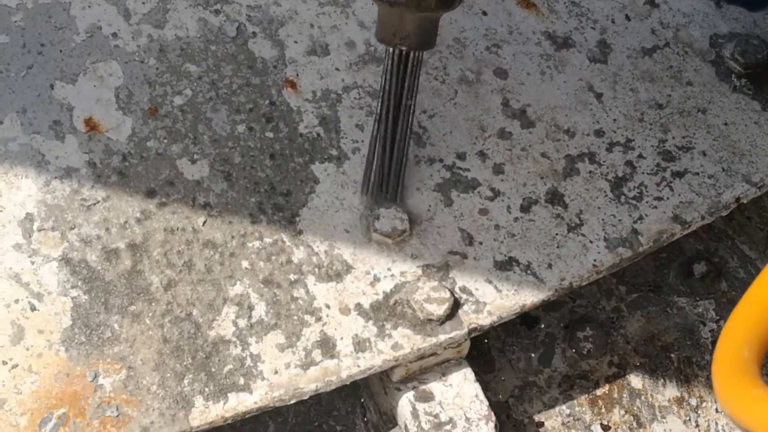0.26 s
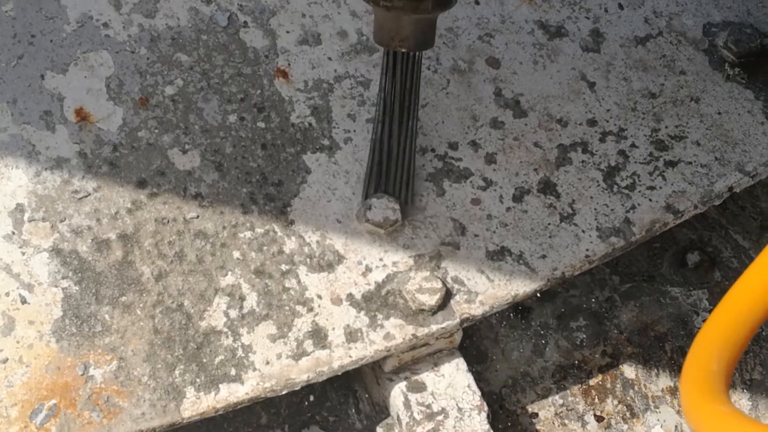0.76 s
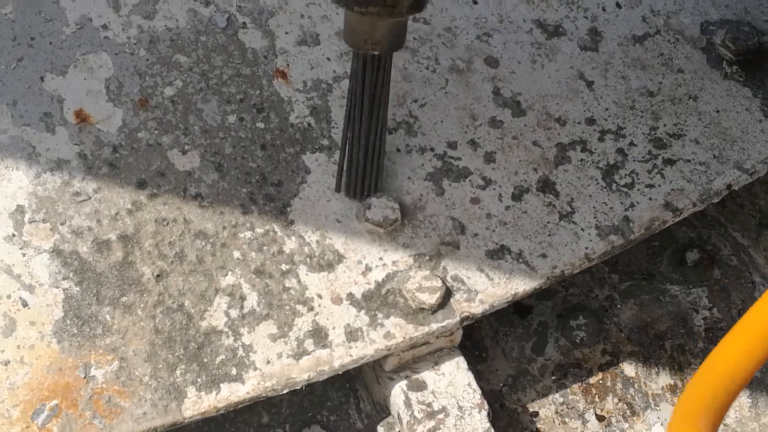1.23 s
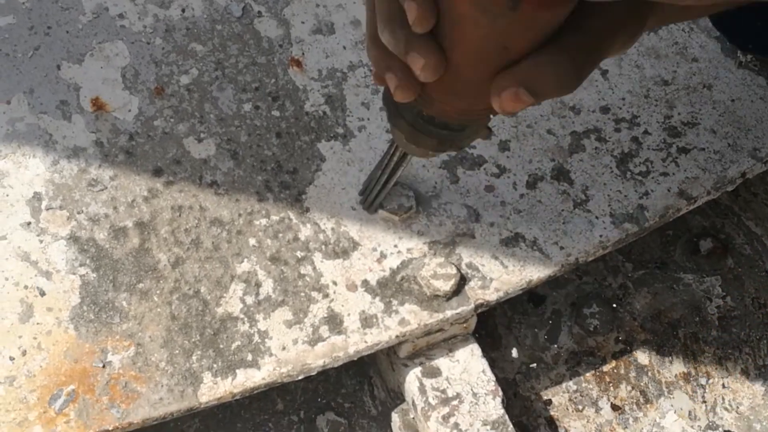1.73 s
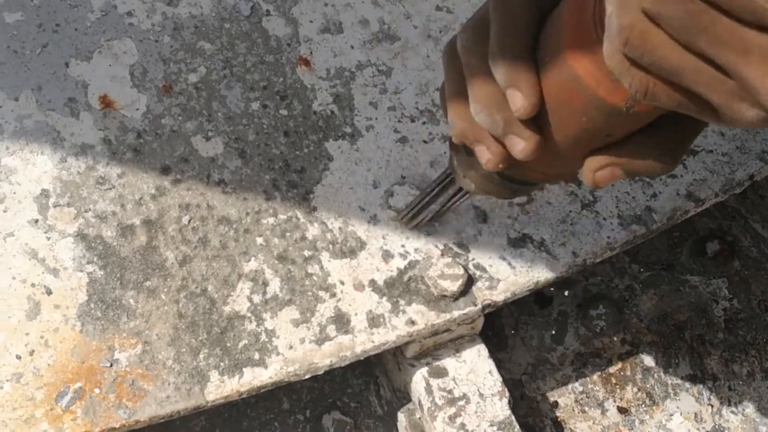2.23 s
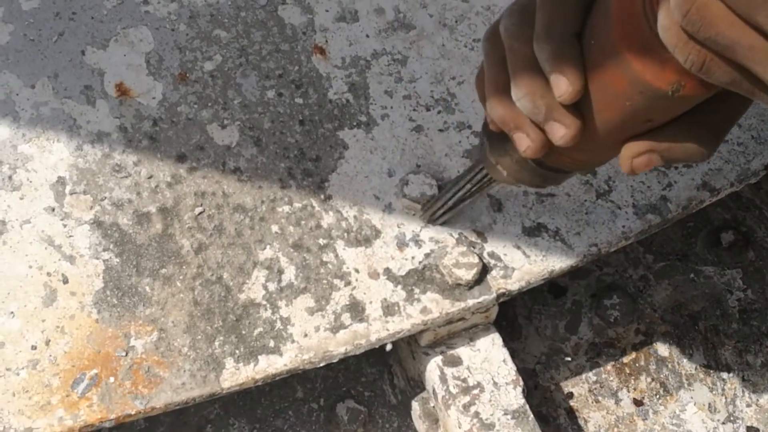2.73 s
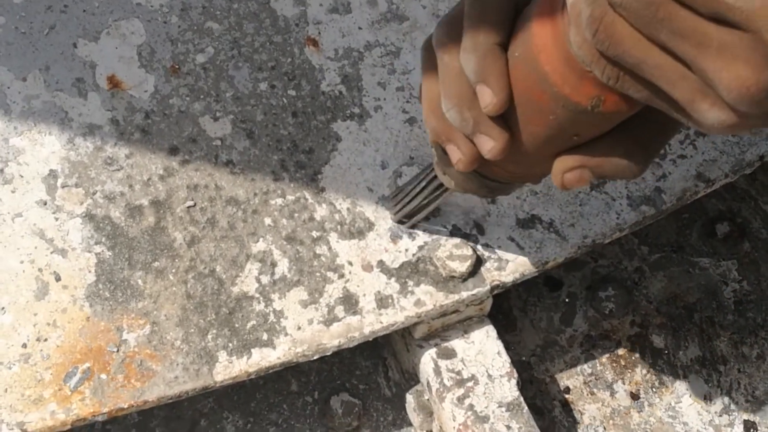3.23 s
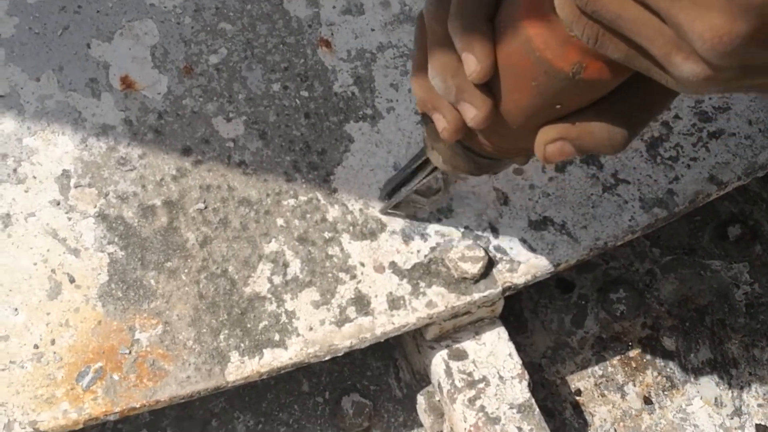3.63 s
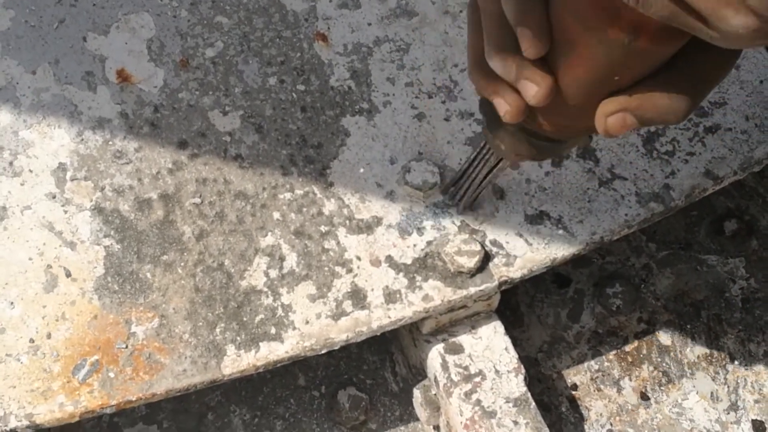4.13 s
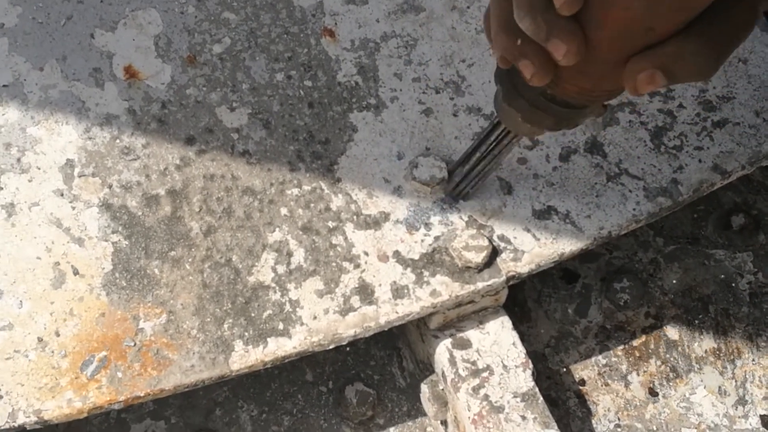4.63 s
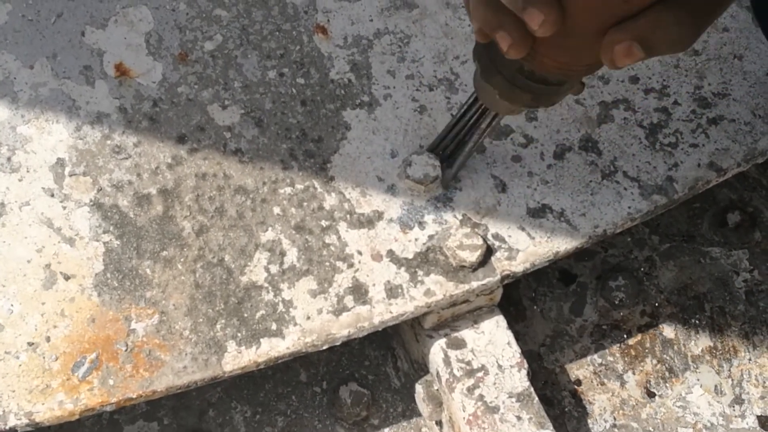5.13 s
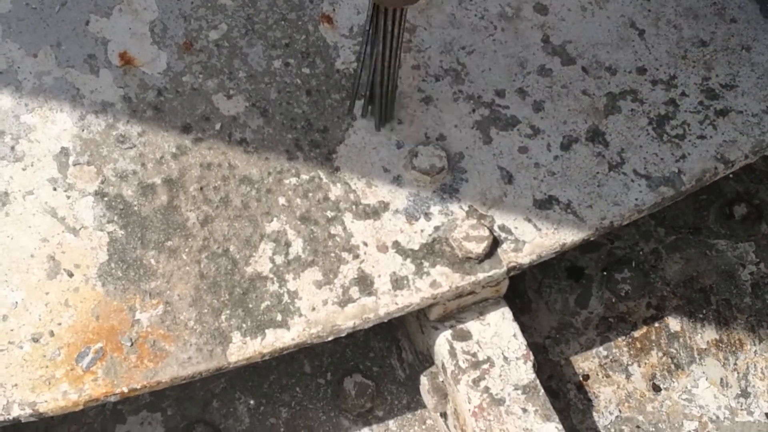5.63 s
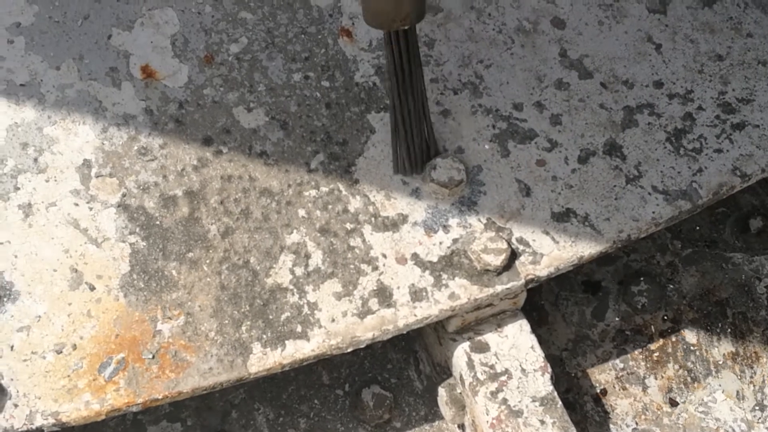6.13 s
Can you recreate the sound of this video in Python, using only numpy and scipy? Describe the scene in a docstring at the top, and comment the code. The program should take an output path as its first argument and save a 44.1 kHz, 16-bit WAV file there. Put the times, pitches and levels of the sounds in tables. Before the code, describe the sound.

Close, buzzing metallic chatter of steel needles chipping a painted plate, with steady hammer blows smacking and ringing the same deck.

```python
"""A harsh, rattling buzz runs throughout: a pneumatic needle scaler chipping paint off a steel deck. Its piston
throws a bundle of needles at the plate about 53 times a second; they crack, bounce, ring and rattle in their guide.
Close by, two hand hammers pound the same deck, each about twice a second, until one stops after 3.5 s;
the blows smack, clang and leave the deck booming.
The left microphone port faces the tool; the right one is shaded and hears it later and duller."""
import sys
import numpy as np
from scipy import signal
from scipy.fft import rfft, irfft, next_fast_len
from scipy.io import wavfile

SR = 44100
rng = np.random.default_rng(int(sys.argv[2]) if len(sys.argv) > 2 else 0)


def store_wav(level_fs):
    """Save 16-bit WAV to argv[1]."""
    pcm = np.round(np.clip(np.atleast_2d(level_fs), -1, 1) * 32767)
    wavfile.write(sys.argv[1], SR, pcm.T.astype(np.int16))


N = 280917

# Piston rate, drifting with air pressure and load: [time_s, strokes_hz]
PISTON_RATE = [(0.0, 51.27), (0.6, 53.79), (0.9, 50.75), (1.05, 53.37), (1.2, 51.47), (1.65, 53.06),
               (2.1, 51.08), (2.25, 52.51), (2.85, 53.75), (3.15, 52.51), (3.6, 55.03), (4.05, 50.67),
               (4.2, 53.74), (5.55, 52.92), (6.37, 55.44)]
# How squarely the bundle is pressed on the plate: [time_s, press_db]
PRESS = [(0.0, -1), (0.75, 3.5), (0.9, -1.2), (1.65, 4.5), (1.8, -3), (2.85, -2.9), (3.15, 0.2), (3.9, -1),
         (5.4, 1.5), (5.7, 9), (5.85, 2.5), (6.37, 2.5)]
# The hardest strikes, some mostly crack, some mostly thump: [start_s, relative crack_db, relative thump_db]
HARD_STRIKES = [(0.022, 0, -43), (0.234, -3, -32), (0.2725, -9, -28.5), (0.3668, -18, -30),
                (0.405, -4, -28), (0.4202, -13, -35), (0.4446, -7, -29), (0.4944, -4, -40),
                (0.5198, -20, -26.5), (0.5736, -4.5, -44), (0.6269, 1, -32), (0.745, -4.5, -25),
                (0.7983, -3.5, -31), (0.879, 2.5, -31), (0.9132, -5, -28.5), (1.0336, -9, -29.5),
                (1.2, 2, -30), (1.307, -2, -27), (1.322, 0, -29), (1.3974, -9, -40), (1.5092, -11, -41),
                (1.607, -7, -35), (1.9696, -13, -29.5), (2.0673, -20, -26.5), (2.7875, -23, -25),
                (3.1443, -0.5, -32.5), (3.1828, -5.5, -35), (3.2389, -8, -28), (3.6284, -5, -40),
                (4.0444, -4, -35), (4.083, -5, -33), (4.627, -14, -29.5), (4.7956, -5.5, -28),
                (4.9633, 2, -29.5), (5.022, -16, -35.5), (5.5296, 5.5, -62), (5.5662, -4, -28),
                (5.624, 0, -38), (5.6772, -3.5, -38), (5.702, -10, -28.5), (5.7397, -5, -31),
                (5.7925, 0, -44), (5.8978, -4.5, -42), (6.0156, -2, -33), (6.1226, 0.5, -32),
                (6.2119, -3.5, -27), (6.2691, -3, -30.5), (6.3249, -0.5, -27)]
# Ring of the needles around 10 kHz: [time_s, relative level_db]
NEEDLE_LEVEL = [(0.0, 2.5), (1.35, -1), (1.8, 3.5), (2.4, 2), (2.55, 2.5), (4.35, 1), (5.4, 0), (5.85, 0),
                (6.37, -2)]
# The barrel sings when the needles lean on it: [time_s, relative level_db]
BARREL_LEVEL = [(0, -5), (1.03, -2), (1.17, 5.5), (1.5, 0), (1.7, -2), (3.7, -4), (4.05, -4), (4.6, -1.5),
                (6.37, 0)]
# Needles glancing off a bolt head: [start_s, relative level_db, centre pitch_hz]
CLINKS = [(0.418, -12, 4430), (0.5732, -11, 4770), (0.9395, -12, 3830), (1.5127, -11, 3780),
          (5.529, -12, 4920), (5.7008, -7, 3830), (5.7384, -12, 3620)]
# Hand hammer blows: [start_s, relative boom_db, relative smack_db]
BLOWS = [(0.159, -8, -15.5), (0.233, -22, -30), (0.642, -5.5, -16.5), (1.097, -15, -24), (1.133, -8.5, -16),
         (1.548, -16, -20.5), (1.615, -7.5, -16), (1.997, -15, -25.5), (2.098, -10, -16),
         (2.447, -13, -19.5), (2.582, -7, -15.5), (2.915, -13.5, -22.5), (3.044, -4.5, -20.5),
         (3.366, -15.5, -22.5), (3.503, -6, -13.5), (3.815, -27, -44), (4.236, -19, -22), (4.685, -12, -21),
         (5.122, -12.5, -28), (5.569, -14.5, -29), (6.025, -11.5, -25.5)]

# Resonances of the needles: [pitch_hz, width_hz, relative level_db]
NEEDLE_MODES = [(6420, 1100, -8), (7850, 370, 0.5), (8420, 930, -3), (9640, 380, -1.5), (9905, 300, 6.5)]
# The needles' highest resonances: [pitch_hz, width_hz, relative level_db]
WHISTLE_MODES = [(13500, 380, -9), (13500, 150, 0), (14000, 300, -10)]
# Resonances of the needle tips: [pitch_hz, width_hz, relative level_db]
TIP_MODES = [(3380, 1050, -13.5), (6470, 175, 3.5), (8000, 610, -4), (9500, 540, -0.5)]
# Resonance of the barrel: [pitch_hz, width_hz, relative level_db]
BARREL_MODES = [(10600, 75, 0)]
# Resonances of the plate under the tool: [pitch_hz, width_hz, relative level_db]
PLATE_MODES = [(480, 28, -18), (930, 120, 4.5), (1172, 105, -2), (1540, 190, -13), (2440, 270, -9.5)]
# Resonances of the bolt head: [pitch_hz, width_hz, relative level_db]
BOLT_MODES = [(1250, 360, -1.5), (1770, 400, -7), (2430, 460, -7), (3400, 710, -7)]
# Modes of the deck under the hammers: [pitch_hz, relative level_db, t60_s]
DECK_MODES = [(161.4, -9, 0.39), (211.2, -5.5, 0.19), (240.2, -4.5, 0.31), (317.7, -10.5, 0.66),
              (342.6, -3.5, 0.15), (384, -9, 0.22), (411, -3.5, 0.21), (443, -4.5, 0.22),
              (508, -16.5, 0.62), (568, -12, 0.55), (620, -8, 0.35), (760, -6, 0.36), (881, 2, 0.12),
              (964, 6, 0.059), (1057, -3, 0.2), (1190, 0, 0.28), (1470, -11.5, 0.54), (1445, 2, 0.26),
              (1565, 5.5, 0.17), (1722, -13, 0.13), (1740, 6, 0.17), (1930, -1, 0.11), (1825, 9.5, 0.14),
              (2510, 8.5, 0.1)]

# Spectrum of the needles cracking on the plate: [freq_hz, relative density_db per Hz]
CRACK = [(60, -5), (200, -18.5), (600, -6.5), (1100, -3.5), (2200, -2.5), (4500, 2), (7000, -7.5),
         (11000, -19.5), (15500, -8.5)]
# Spectrum of the needles rattling in their guide: [freq_hz, relative density_db per Hz]
RATTLE = [(1000, -17), (4000, -28), (5500, -2.5), (9000, 1.5), (11000, -0.5), (12500, 0.5), (15500, -1.5)]
# Spectrum of the tips skidding through paint and rust: [freq_hz, relative density_db per Hz]
SCRAPE = [(150, -16), (400, -1.5), (650, -2), (1200, -1), (1900, -4.5), (2500, -0.5), (3500, -1),
          (4800, -3), (8000, -34)]
# Spectrum of the plate's low hum: [freq_hz, relative density_db per Hz]
DRONE = [(20, -38), (60, -3.5), (110, 0.5), (160, 1), (230, 0.5), (330, -5), (520, -3), (700, -23),
         (2000, -43)]
# Spectrum of the hard knock of a stroke: [freq_hz, relative density_db per Hz]
KNOCK = [(100, -17), (300, -3.5), (700, -0.5), (1300, -2.5), (2200, -2), (4000, -13.5), (6000, -11),
         (12000, -21)]
# Spectrum of the plate being shoved down: [freq_hz, relative density_db per Hz]
THUMP = [(8, -26), (25, 1.5), (70, -6.5), (130, -4.5), (250, -12.5), (600, -36.5), (2000, -48)]
# Spectrum of a hammer blow's smack: [freq_hz, relative density_db per Hz]
SMACK = [(500, -37), (1100, -18.5), (1550, -4.5), (1900, -4), (2300, -3), (3400, 0.5), (4600, -4),
         (6500, -10), (9000, -13), (15000, -18)]
# Spectrum of its clang in the deck's dense upper modes: [freq_hz, relative density_db per Hz]
CLANG = [(250, -25.5), (550, -10), (700, 3.5), (900, 0), (1100, 2), (1300, 0.5), (1600, -12), (3000, -34.5)]
# Spectrum of its boom: [freq_hz, relative density_db per Hz]
BOOM = [(40, -17), (120, -14.5), (170, -8.5), (250, -1.5), (480, -3.5), (700, -12), (1200, -18.5),
        (3000, -66)]
# Spectrum of the bending wave it sends through the deck: [freq_hz, relative density_db per Hz]
WAVE = [(60, -36), (150, -15.5), (290, -1.5), (500, 0.5), (900, -7.5), (1700, -2.5), (4000, -17),
        (10000, -59)]
# How fast the noise of a blow dies: [freq_hz, t60_s]
HAMMER_DECAY = [(150, 0.46), (300, 0.14), (600, 0.37), (1500, 0.2), (3000, 0.1), (6000, 0.075),
                (12000, 0.062)]

# Level of the shaded right port against the left: [freq_hz, level_db]
SHADE = [(60, 0.6), (220, 1), (380, -2), (700, -7.5), (1000, -8.5), (1300, -5), (1800, -5), (2600, -6),
         (4200, -4), (5200, -14), (6300, -15), (7500, -25), (10500, -24.5), (15000, -32)]
# Phase lag of the right port behind the left: [freq_hz, lag_rad]
LAG = [(20, .1), (100, 0.39), (220, 0.78), (400, 1.98), (700, 2.47), (950, 6.87), (1700, 7.03),
       (2300, 8.38), (3300, 7.18), (4300, 10.5), (6300, 10.9), (8300, 17), (15000, 58)]
# Direct sound shared by both ports: [freq_hz, share 0-1]
DIRECT = [(60, 0.86), (150, 0.96), (300, 1), (700, 0.92), (1400, 0.58), (3000, 0.34), (10000, 0.33)]

FIRST_STROKE_S, JITTER_S = 0.0021, 0.0007
# Ordinary stroke: relative level, dB per dB of press, spread
STROKE_DB, STROKE_GROWS, STROKE_SCATTER_DB = -16.5, 1.14, 4.5
REBOUND = 0.77  # share of a stroke's excess that the next one lacks
# Shove on the plate: relative level, dB per dB of press, spread, ceiling
THUMP_DB, THUMP_GROWS, THUMP_SCATTER_DB, THUMP_TOP_DB = -46.5, 0.86, 7.5, -32.5
# Layers of the tool: level, dB per dB of press
RATTLE_DB, RATTLE_GROWS = -24.5, 0.053
SCRAPE_DB, SCRAPE_GROWS = -28.5, 0.23
PLATE_DB, PLATE_GROWS = -33, 0.1
DRONE_DB, DRONE_GROWS = -37.5, 0.082
RING_DB, WHISTLE_DB, BARREL_DB = -29, -32, -32
# Chatter against the side of a bolt head: middle, half length (to 1/e), level
BOLT_S, BOLT_LENGTH_S, BOLT_DB = 5.325, 0.21, -26
TICK_T60_S, CLINK_T60_S = 0.045, 0.026  # before the closing fade
CLANG_DB, CLANG_GROWS = -12, 0.19  # a blow's clang: relative level, dB per dB of smack
# Bending wave: relative to the boom; travel times at 1 kHz; loss at each edge
WAVE_DB, FIRST_PATH_S, NEXT_PATH_S, EDGE_LOSS_DB = 13, 0.0034, 0.0135, 1
TOP_HZ = 15850  # band limit of the recorder


def strokes():
    """Time, crack level and thump level of every piston stroke: harder when pressed, weaker after a hard one."""
    rate_hz, = curves(PISTON_RATE)
    press_db, = curves(PRESS)
    cycles = np.cumsum(rate_hz) / SR
    clock_s = np.arange(N) / SR
    beat_s = FIRST_STROKE_S + np.interp(np.arange(int(cycles[-1]) + 1), cycles, clock_s)
    early, luck, flat = rng.standard_normal((N // 100, 3))[:len(beat_s)].T
    luck = unit(signal.lfilter([1, -REBOUND], [1], np.tanh(luck / 2)))
    pressed_db = np.interp(beat_s, clock_s, press_db)
    times = beat_s + JITTER_S * early
    crack_db = STROKE_DB + STROKE_GROWS * pressed_db + STROKE_SCATTER_DB * luck
    thump_db = THUMP_DB + THUMP_GROWS * pressed_db + THUMP_SCATTER_DB * unit(luck + flat)
    thump_db = np.minimum(thump_db, THUMP_TOP_DB)
    # the hardest strikes replace the ordinary strokes nearest to them
    start_s, hard_crack_db, hard_thump_db = np.transpose(HARD_STRIKES)
    nearest = np.argmin(abs(beat_s - start_s[:, None]), axis=1)
    times[nearest], crack_db[nearest], thump_db[nearest] = start_s, hard_crack_db, hard_thump_db
    return times, crack_db, thump_db


def scaler(times, db):
    """Each stroke cracks on the plate; the needles bounce, are jerked back and clatter until the next one."""
    press_db, = curves(PRESS)
    needle_db, = curves(NEEDLE_LEVEL)
    barrel_db, = curves(BARREL_LEVEL)
    uneven = rng.standard_normal((N // 100, 6))[:len(times)].T
    force_db = db - np.mean(db)

    # the tips land almost together, each time on other spots
    crack_power = bursts(times, db - 5.5 + uneven[3], life=0.0015)
    crack = coloured(contacts(crack_power, spread_db=1.5), CRACK)
    tip_power = bursts(times, 0.21 * force_db - 19.0 + 2 * uneven[4], life=0.002)
    tips = resonate(contacts(tip_power, spread_db=1), TIP_MODES)

    # bounces, then the return stroke late in the cycle, over needles that never quite rest
    bounce = bursts(times, 0.26 * force_db + 2.2 * uneven[0], life=0.0075)
    recoil_times = times + 0.0132 + 0.0011 * uneven[5]
    recoil = bursts(recoil_times, -3.5 + 3.15 * uneven[1], life=0.0081)
    loose = unit(np.sqrt(bounce + recoil + amp(-12.5) ** 2)) ** 2
    rattle_gain = amp(RATTLE_DB + RATTLE_GROWS * press_db)
    rattle = rattle_gain * coloured(contacts(loose, spread_db=3.5), RATTLE)
    clatter = contacts(loose, spread_db=4.5)
    ring = amp(RING_DB + needle_db + 1.4 * wobble(14)) * resonate(clatter, NEEDLE_MODES)
    whistle = amp(WHISTLE_DB + 2.0 * wobble(2.7)) * resonate(clatter, WHISTLE_MODES)
    barrel = amp(BARREL_DB + barrel_db) * resonate(clatter, BARREL_MODES)

    # the tips skid through paint and rust that give way in patches
    scrape_gain = amp(SCRAPE_DB + SCRAPE_GROWS * press_db + 2.2 * wobble(22))
    scrape = scrape_gain * coloured(contacts(loose + amp(-6) ** 2, spread_db=3.5), SCRAPE)

    # the plate answers the blow itself and keeps humming between blows
    push = unit(np.sqrt(bursts(times, 0.3 * force_db + 2.8 * uneven[2], life=0.0033))) ** 2
    plate_gain = amp(PLATE_DB + PLATE_GROWS * press_db + 2.5 * wobble(9))
    plate = plate_gain * resonate(contacts(push + amp(-8.5) ** 2, spread_db=2.0), PLATE_MODES)
    drone_gain = amp(DRONE_DB + DRONE_GROWS * press_db + 0.5 * wobble(9))
    drone = drone_gain * coloured(contacts(push + amp(-2.5) ** 2, spread_db=0.0), DRONE)

    touch = np.exp(-((np.arange(N) / SR - BOLT_S) / BOLT_LENGTH_S) ** 2)
    bolt = amp(BOLT_DB) * touch * resonate(clatter, BOLT_MODES)
    return crack + tips + rattle + ring + whistle + barrel + scrape + plate + drone + bolt


def thumps(times, db):
    """Each stroke, by its thump level, knocks and shoves the whole plate down for a moment."""
    knock = coloured(contacts(bursts(times, db + 18, life=0.0014), spread_db=3), KNOCK)
    shove = coloured(impulses(times, -amp(db + 25.5)), THUMP)
    return knock + shove


def glances():
    """Needles glance off the bolt heads with a clink, and off rough spots with faint ticks of any pitch."""
    start_s, level_db, pitch_hz = np.transpose(CLINKS)
    when, size, pitch = rng.random((N // 2000, 3)).T
    faint_hz = 2200 * 2 ** (1.7 * pitch)
    faint = needle_ticks(when * N / SR, -24 - 12 * size, faint_hz, t60=TICK_T60_S)
    return needle_ticks(start_s, level_db - 0.5, pitch_hz, t60=CLINK_T60_S) + faint


def needle_ticks(times, db, hz, t60):
    """Single needles ring briefly in three close bending modes until their neighbours stop them."""
    t = np.arange(SR // 25) / SR
    detune, phase = rng.standard_normal((N // 400, 2, 3, 1))[:len(times)].transpose(1, 0, 2, 3)
    mode_hz = hz[:, None, None] * (1 + 0.07 * detune)
    tones = np.sin(2 * np.pi * (mode_hz * t + phase)).sum(axis=1)
    decay = amp(db[:, None] - 60 * t / t60)
    ticks = decay * tones * (1 - t / t[-1])
    return impulses((times[:, None] + t).ravel(), ticks.ravel())


def hammers(attack, swell):
    """Each blow smacks, clangs in the dense upper modes of the deck and leaves its low modes booming."""
    t = np.arange(SR // 4) / SR
    track = np.zeros((2, N + SR))
    hz, mode_db, t60 = np.transpose(DECK_MODES)[:, :, None]
    ringing = amp(mode_db - 60 * t / t60)
    for start_s, boom_db, smack_db in BLOWS:
        clang_db = CLANG_DB + CLANG_GROWS * smack_db
        size, phase = rng.standard_normal((2, len(DECK_MODES), 1))
        # low modes follow the boom, middle ones the clang, high ones the smack
        drive_db = along([(450, boom_db), (900, clang_db), (1500, smack_db)], hz)
        mode_gain = amp(drive_db - 11 + 2.4 * size)
        modes = np.sum(ringing * mode_gain * np.sin(2 * np.pi * (hz * t + phase)), axis=0)
        boom = amp(boom_db - 10) * coloured(dying_noise(t), BOOM)
        clang = amp(clang_db - 2.0) * coloured(dying_noise(t), CLANG)
        smack = amp(smack_db + 8) * coloured(dying_noise(t), SMACK)
        # bending waves in steel carry the treble ahead of the bass, so the smack rises a little faster
        sharp = smack * (1 - np.exp(-t / attack))
        body = (modes + boom + clang) * (1 - np.exp(-t / swell))
        wave = amp(boom_db + WAVE_DB) * bending_wave(len(t))
        track[:, round(start_s * SR):][:, :len(t)] += sharp + body + wave
    return track[:, :N]


def dying_noise(t):
    """Noise at both ports whose bands each die at their own rate, the high treble fastest."""
    hz, s, bins = signal.stft(scattered(len(t)), SR, nperseg=256)
    decay = amp(-60 * s / along(HAMMER_DECAY, hz)[:, None])
    return signal.istft(bins * decay, SR, nperseg=256)[1][:, :len(t)]


def bending_wave(size):
    """A blow runs through the deck and returns from its edges; the treble travels faster than the bass."""
    turn = np.arange(5)
    path_s = FIRST_PATH_S + NEXT_PATH_S * turn * (1 + 0.15 * rng.standard_normal(len(turn)))
    hz = np.fft.rfftfreq(size, 1 / SR)
    # this phase delays each frequency by path_s * sqrt(1000 / hz)
    phase = 4 * np.pi * path_s[:, None] * np.sqrt(1000 * hz)
    arrivals = amp(-EDGE_LOSS_DB * turn) @ np.exp(-1j * phase)
    return coloured(irfft(arrivals, size), WAVE)


def contacts(power, spread_db):
    """A dense swarm of tiny steel contacts of uneven size under a power envelope."""
    sizes = np.repeat(amp(spread_db * rng.standard_normal(N // 32 + 1)), 32)[:N]
    return np.sqrt(power) * scattered(N) * unit(sizes)


def bursts(times, db, life):
    """Power envelope that jumps at each time; life is the time constant of its amplitude in seconds."""
    decay = np.exp(-2 / (abs(life) * SR))
    return signal.lfilter([1], [1, -decay], impulses(times, amp(db) ** 2))


def impulses(times, sizes):
    """One spike at each time."""
    positions = np.clip(np.round(times * SR).astype(int), 0, N)
    return np.bincount(positions, sizes, N + 1)[:N]


def resonate(x, modes):
    """x through a bank of resonances of alternating sign and unit energy."""
    def response(hz):
        bank = 0
        for k, (pitch_hz, width_hz, db) in enumerate(modes):
            damping = 1j * hz * width_hz
            bank = bank + (-1) ** k * amp(db) * damping / (pitch_hz * pitch_hz - hz * hz + damping)
        return bank / np.sqrt(np.mean(abs(bank) ** 2))
    return filtered(x, response)


def coloured(x, spectrum):
    """x through a causal filter of unit energy with this spectrum."""
    def response(hz):
        # folding the cepstrum gives the minimum-phase filter
        cepstrum = irfft(np.log(unit(amp(along(spectrum, hz)))))
        half = len(cepstrum) // 2
        cepstrum[1:half] *= 2
        cepstrum[half + 1:] = 0
        return np.exp(rfft(cepstrum))
    return filtered(x, response)


def filtered(x, response):
    """x times a complex response of frequency."""
    size = 2 * next_fast_len(x.shape[-1] // 2 + SR // 10, True)
    hz = np.fft.rfftfreq(size, 1 / SR)
    return irfft(rfft(x, size) * response(hz), size)[..., :x.shape[-1]]


def wobble(rate):
    """A wandering random curve, rate knots a second."""
    knots = rng.standard_normal(N // 200)
    return np.interp(np.arange(N) * rate / SR, np.arange(len(knots)), knots)


def curves(rows):
    """One value per sample for each column after the time."""
    s, *columns = np.transpose(rows)
    return [np.interp(np.arange(N) / SR, s, column) for column in columns]


def along(points, hz):
    """(Hz, value) points read on a log axis."""
    f, v = np.transpose(points)
    return np.interp(np.log(hz + 1), np.log(f + 1), v)


def amp(db):
    """Decibels to gain."""
    return 10 ** (np.asarray(db) / 20)


def unit(x):
    """x at rms 1."""
    return x / np.sqrt(np.mean(x ** 2) + 1e-20)


def scattered(size):
    """White noise at the two ports: the right one shares only the direct part with the left."""
    padded = next_fast_len(size)
    direct, stray = rfft(rng.standard_normal((2, padded)))
    share = np.clip(along(DIRECT, np.linspace(0, SR / 2, len(direct))), 0, 1)
    right = share * direct + np.sqrt(1 - share ** 2) * stray
    return irfft([direct, right], padded)[:, :size]


def far_port(x):
    """Sound bends around the recorder's body and reaches the shaded port late and dull."""
    return filtered(x, lambda hz: amp(along(SHADE, hz)) * np.exp(-1j * along(LAG, hz)))


def scene():
    """The work on deck as both ports hear it."""
    times, crack_db, thump_db = strokes()
    tool = scaler(times, crack_db) + glances() + thumps(times, thump_db)
    left, right = tool + hammers(attack=0.00031, swell=0.00034)  # rise time constants in s
    return np.array([left, far_port(right)])


def record(dry):
    """The recorder rounds off the highest peaks and keeps nothing above its band limit."""
    rounded = dry / (1 + np.abs(dry) ** 6) ** (1 / 6)
    return filtered(rounded, lambda hz: hz < TOP_HZ)


dry = scene()
out = record(dry)
store_wav(out)
```